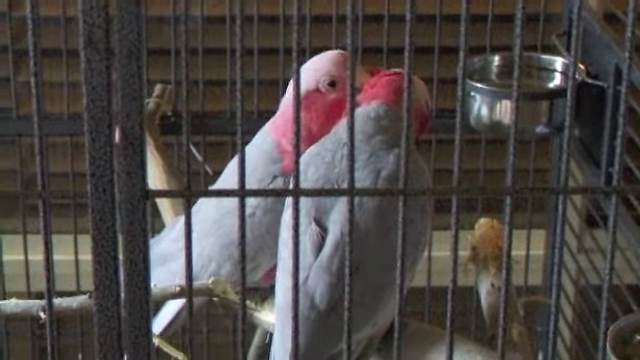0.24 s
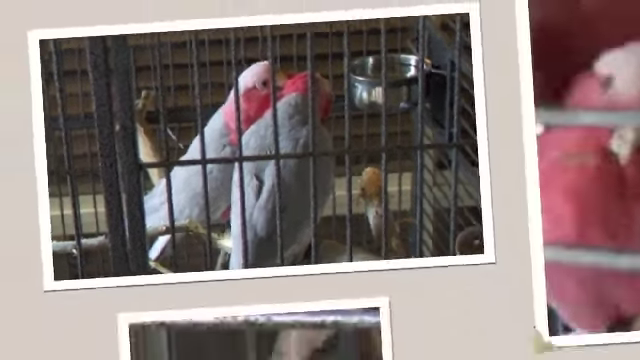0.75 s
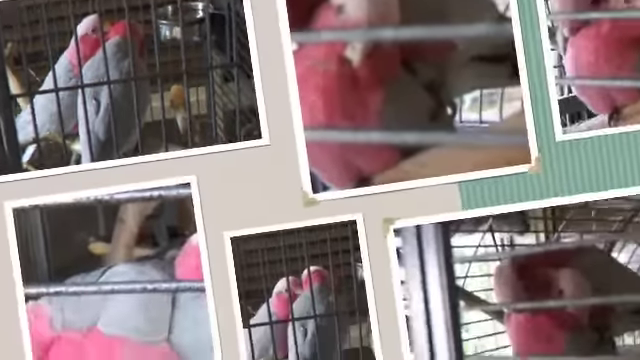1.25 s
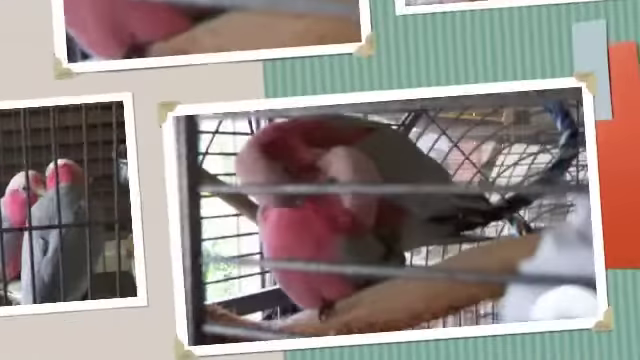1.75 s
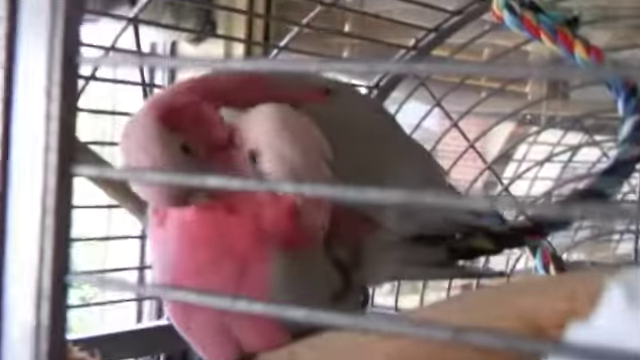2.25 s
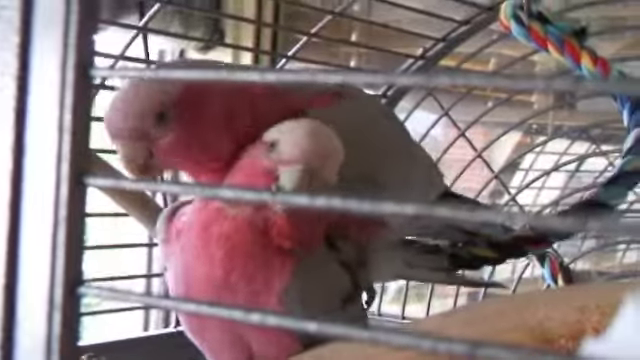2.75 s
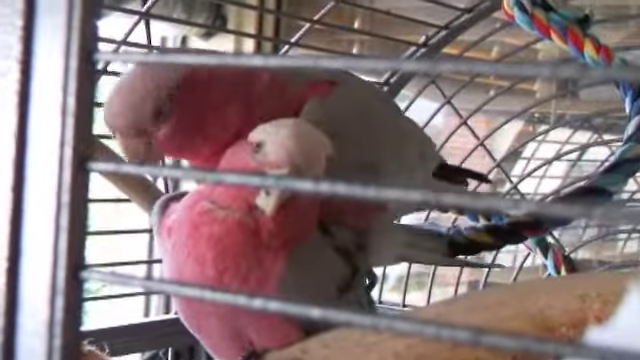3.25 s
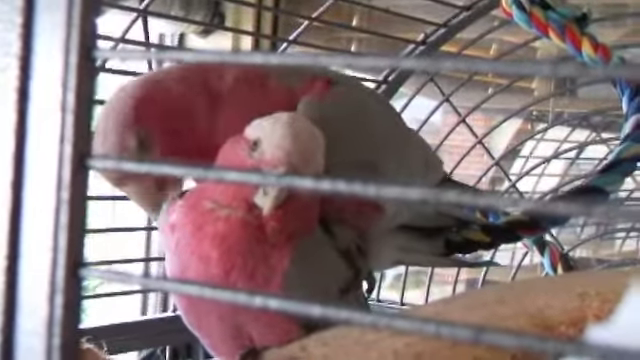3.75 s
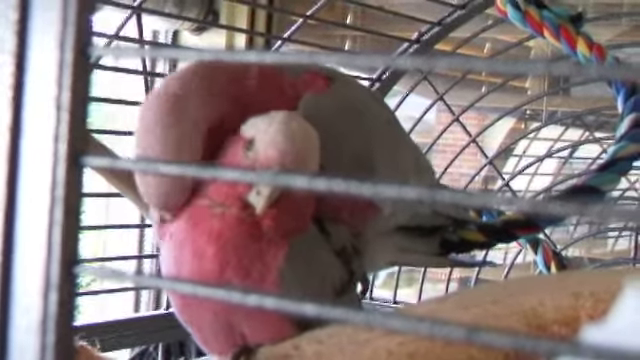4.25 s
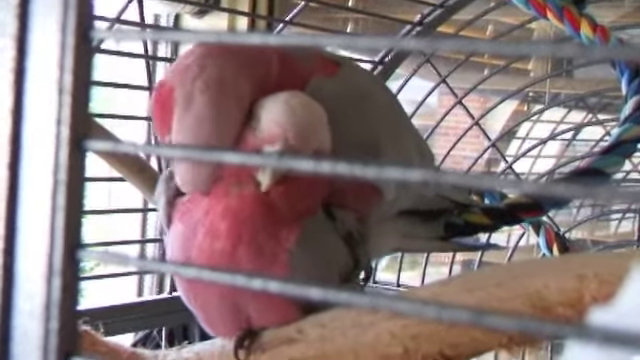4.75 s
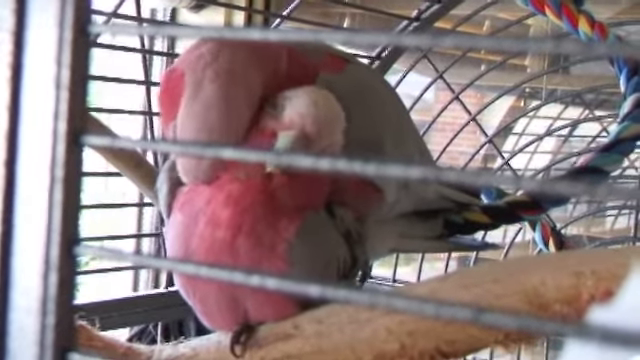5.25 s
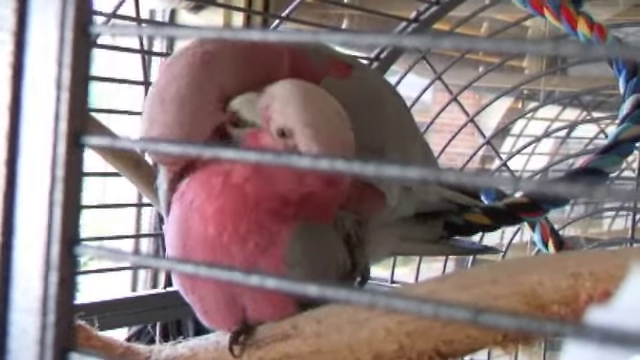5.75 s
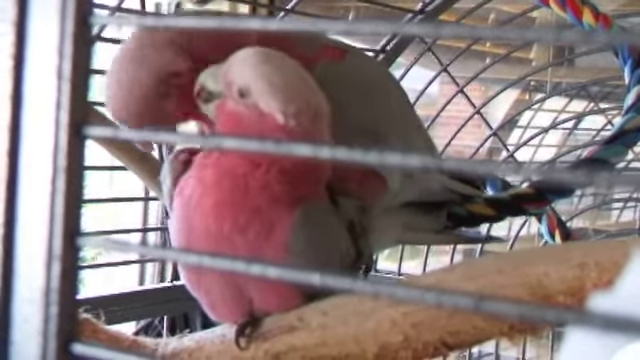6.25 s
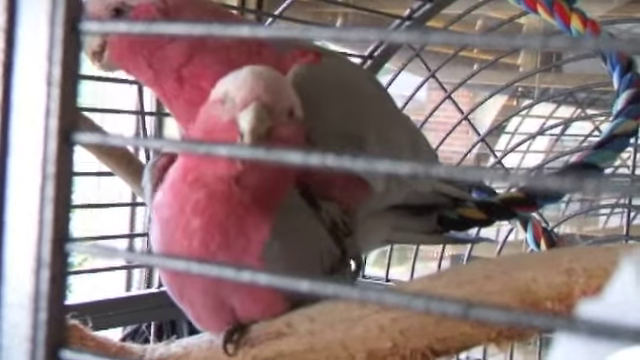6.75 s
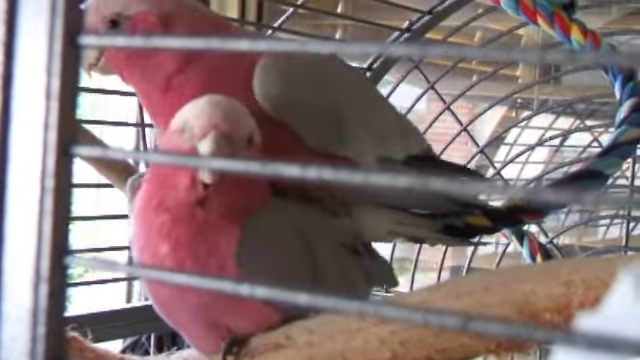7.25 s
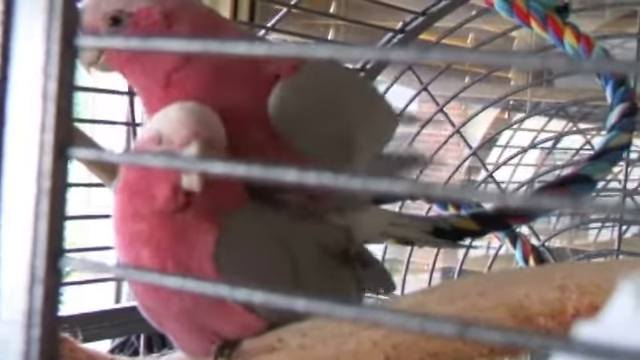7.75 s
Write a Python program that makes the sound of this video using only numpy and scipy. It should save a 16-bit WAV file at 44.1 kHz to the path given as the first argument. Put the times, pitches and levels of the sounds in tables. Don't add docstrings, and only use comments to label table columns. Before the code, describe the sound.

Two cockatoos give shrill, hoarse two-note squeaks while claws and beaks knock ringing cage bars and feathers scrape wire on a hard-walled porch.

```python
import sys
import numpy as np
from scipy import signal
from scipy.fft import rfft, irfft
from scipy.io import wavfile
from scipy.ndimage import uniform_filter1d

SR = 44100
rng = np.random.default_rng(int(sys.argv[2]) if len(sys.argv) > 2 else 0)


def dump(signal):
    limited = np.clip(np.atleast_2d(signal).T, -1, 1)
    pcm = np.round(limited * 32767).astype(np.int16)
    wavfile.write(sys.argv[1], SR, pcm)


def rack_gain(trim_db):
    fader = np.asarray(trim_db, float)
    return 10 ** (fader / 20)


N = 352800
TIME = np.arange(N) / SR
CUT_S = 1.343


def in_time(rows):
    s, *columns = np.transpose(rows)
    return [np.interp(TIME, s, column) for column in columns]


def rms_one(x):
    return x / np.sqrt(np.mean(x ** 2) + 1e-20)


def band(x, low_hz, high_hz):
    return signal.sosfilt(signal.butter(2, [low_hz, high_hz], "band", fs=SR, output="sos"), x)


def drift(rate_hz):
    r = np.exp(-2 * np.pi * rate_hz / SR)
    wander = signal.lfilter([1], [1, -2 * r, r * r], rng.standard_normal(N + SR))
    return rms_one(wander[SR:])


def coloured(white, spectrum):
    hz, db = np.transpose(spectrum)
    bins = np.log(np.arange(N // 2 + 1) * SR / N + 1)
    return rms_one(irfft(rfft(white) * rack_gain(np.interp(bins, np.log(hz), db)), N))


def soft_ends(rows, fade_s):
    return np.clip(np.minimum(TIME - rows[0][0], rows[-1][0] - TIME) / fade_s, 0, 1)


def pings(rows, t60s, rise_s):
    out = np.zeros(N)
    for (s, db, hz, *_), t60 in zip(rows, t60s):
        t = np.maximum(TIME - s, 0)
        out += rack_gain(db - 60 * t / t60) * (1 - np.exp(-t / rise_s)) * np.sin(2 * np.pi * hz * t)
    return out


def fade_in_db():
    # t/s, level/dB
    fade = [(1.35, -38), (1.45, -24), (1.62, -15.5), (1.85, -10.5), (2.05, -7)]
    return in_time(fade)[0]


def air(spectrum, level_db):
    return rack_gain(level_db + 2.25 * drift(4.9)) * coloured(rng.standard_normal(N), spectrum)


def traffic():
    # t/s, level/dB, half width/s
    passes = [(2.32, -44, 0.05), (3.85, -66, 0.24), (4.68, -57, 0.046), (4.95, -61, .08), (7.0, -67, 0.58)]
    hum = rack_gain(-60) * np.where(TIME < CUT_S, 1, rack_gain(fade_in_db()))
    for s, db, width_s in passes:
        hum = hum + rack_gain(db) * np.exp(-((TIME - s) / width_s) ** 2)
    return hum * rms_one(band(rng.standard_normal(N), 61, 75))


def camera_thumps():
    # t/s, peak level/dB, f/Hz, t60/s
    thumps = [
        (0.298, -40, 139, 0.086),
        (2.285, -37, 135.4, 0.35),
        (6.019, -42.5, 229, 0.72),
    ]
    return pings(thumps, [row[3] for row in thumps], rise_s=0.00079)


def squeak_rows(beats, pitches, effort, held_s):
    # share of rise time, share of pitch step, level under top/dB, beak/dB
    arch_up = [(0, 0, -9, -9.5), (0.182, .45, -9.5, 11.5), (0.549, .93, -1, 7.5), (1, 0.99, 1, -1.5)]
    # time after top/s, share of top pitch, level under top/dB, beak/dB
    arch_down = [(.007, .94, -3, 8), (.015, .84, -3.5, 4), (.028, .66, -23.5, -8.5)]
    hoarse = dict(rise=.15, fall=.7, climb=.48, crack=.75, settle=.12, held=.03)
    crack_s, settle_s, swell_s, release_s = .012, .006, .012, .02
    crack_db = -1.5
    start, top, climb, crack, clear = beats
    start_hz, top_hz, from_hz, to_hz, held_hz = pitches
    top_db, arch_beak_db, climb_db, held_db, beak_db = effort

    rows = []
    for share, step, db, open_db in arch_up:
        pitch = start_hz + step * (top_hz - start_hz)
        rows.append((start + share * (top - start), pitch, top_db + db, arch_beak_db + open_db, hoarse["rise"]))
    for t, share, db, open_db in arch_down:
        rows.append((top + t, top_hz * share, top_db + db, arch_beak_db + open_db, hoarse["fall"]))

    wide_db = beak_db + 0.5
    end = clear + held_s
    swelled_hz = from_hz + (to_hz - from_hz) * swell_s / (crack - crack_s - climb)
    return rows + [
        (climb, from_hz, climb_db - 10.5, wide_db, hoarse["climb"]),
        (climb + swell_s, swelled_hz, climb_db, wide_db, hoarse["climb"]),
        (crack - crack_s, to_hz, climb_db, wide_db, hoarse["climb"]),
        (crack, held_hz * 1.07, held_db + crack_db, wide_db, hoarse["crack"]),
        (clear - settle_s, held_hz * 1.01, held_db + 2 * crack_db, beak_db, hoarse["crack"]),
        (clear, held_hz, held_db, beak_db, hoarse["settle"]),
        (end, held_hz, held_db - 9, beak_db, hoarse["held"]),
        (end + release_s, held_hz, held_db - 52, beak_db, hoarse["held"])]


def squeak(rows, shake, throb, hiss):
    pitch, level_db, beak_db, rough = in_time(rows)
    pitch = uniform_filter1d(pitch, size=500)
    phase = 2 * np.pi * np.cumsum(pitch * (1 + .045 * rough * shake)) / SR
    third = rack_gain(-2 - 12 * np.clip(3 * pitch / 1000 - 7.1, 0, 3))
    upper = np.sin(2 * phase)
    upper += third * np.clip(3.3 * rough, .35, 1) * np.sin(3 * phase)
    upper += rack_gain(-19.5) * np.sin(4 * phase)
    upper += rack_gain(-14) * rough * hiss
    chop_db = 9 * np.tanh(rough * throb)
    return soft_ends(rows, .003) * rack_gain(level_db + chop_db) * (np.sin(phase) + rack_gain(beak_db) * upper)


def cockatoo_calls():
    # start/s, top/s, climb/s, crack/s, clear tone/s
    beats = [(1.148, 1.184, 1.228, 1.272, 1.29),
                                                                                                                  (1.634, 1.684, 1.725, 1.764, 1.79),
                                                                                                                  (3.056, 3.09, 3.135, 3.177, 3.214),
                                                                                                                  (4.997, 5.028, 5.075, 5.158, 5.178),
                                                                                                                  (7.599, 7.638, 7.678, 7.737, 7.75)]
    # start f/Hz, top f/Hz, climb from f/Hz, climb to f/Hz, held f/Hz
    pitches = [(2400, 2640, 1720, 1950, 2020), (2760, 3300, 2000, 2480, 2605),
               (2630, 3150, 2000, 2400, 2578), (2435, 2880, 2090, 2220, 2410),
               (2693, 2980, 2150, 2360, 2305)]
    # arch level/dB, arch beak/dB, climb level/dB, held level/dB, held beak/dB
    efforts = [(-30.5, -4.5, -27, -34, -9.5), (-7.5, -0.5, -17, -9.5, 6), (-7, 1, -12, -8, 2.5),
               (-8, 0.5, -16.5, -11, 2.5), (-8.5, 4.5, -13, -8.5, -1)]
    held_s = [.005, .07, .112, .02, .065]
    shake, throb = drift(500), drift(230)
    hiss = rms_one(band(rng.standard_normal(N), 4200, 7500))
    calls = [squeak_rows(*parts) for parts in zip(beats, pitches, efforts, held_s)]
    return [squeak(rows, shake, throb, hiss) for rows in calls]


def porch(x, wet_db):
    t = TIME[:SR]
    near, far = (rms_one(rack_gain(-60 * t / t60)) / np.sqrt(SR) for t60 in (.3, .55))
    echo_gap_s = .006
    build_up = 1 - np.exp(-(t / echo_gap_s) ** 2)
    tail = rng.standard_normal(SR) * np.hypot(rack_gain(-3) * near, rack_gain(-9) * far) * build_up
    heard = x + rack_gain(wet_db) * signal.fftconvolve(x, tail)[:N]
    return signal.sosfilt(signal.butter(4, 7700, fs=SR, output="sos"), heard)


def rustle():
    # f/Hz, level/dB per Hz
    scrape_colour = [(1350, -43), (2300, -16.5), (2690, -8.5), (3350, -12.5), (5160, -10.5), (6460, -9),
                     (7210, -11), (8000, -4), (10400, -77.5), (17600, -120)]
    # t/s, bright scrape level/dB, dull shuffle level/dB, swell/s, fade t60/s
    shifts = [(2.031, -51, -57, .02, 3.2), (2.305, -39.5, -48, 0.014, 0.39),
              (2.535, -44.5, -49.5, 0.058, 1.3), (2.645, -42, -50, 0.013, 1.05),
              (3.71, -51.5, -71, 0.044, 0.077), (4.357, -44, -46, 0.018, 0.18),
              (4.448, -25.5, -36, 0.004, 0.22), (4.599, -60, -51, 0.061, .5),
              (4.719, -52.5, -55.5, 0.057, 1.05), (5.639, -42.5, -40.5, 0.0068, 0.72),
              (5.982, -29.5, -31, 0.0056, .9), (6.068, -31, -51, 0.14, 0.54), (6.455, -35, -39, 0.01, 0.53),
              (6.92, -35, -45, 0.15, 0.36), (7.0, -36.5, -41, 0.031, 0.99), (7.345, -44, -47, 0.02, 0.76),
              (7.53, -47, -49, 0.18, 0.22)]
    grains_per_s = 5000
    grain_db = 1.6 * np.minimum(rng.exponential(1, N), 4) + 1.51 * drift(38)
    grains = (rng.random(N) < grains_per_s / SR) * rack_gain(20 * grain_db / 20) * rng.choice([-1, 1], N)
    bright = coloured(grains, scrape_colour)
    dull = rms_one(band(grains[::-1], 620, 2200))
    fidget = rack_gain(fade_in_db())
    scrape, shuffle = rack_gain(-53.5) * fidget, rack_gain(-56.5) * fidget
    for s, scrape_db, shuffle_db, swell_s, t60 in shifts:
        shape_db = np.where(TIME < s, 20 * (TIME - s) / swell_s, -60 * (TIME - s) / t60)
        scrape = np.hypot(scrape, rack_gain(scrape_db + shape_db))
        shuffle = np.hypot(shuffle, rack_gain(shuffle_db + shape_db))
    return rack_gain(5.0) * (scrape * bright + shuffle * dull)


def far_tone(rows, flutter):
    pitch, level_db = in_time(rows)
    phase = 2 * np.pi * np.cumsum(pitch) / SR
    return soft_ends(rows, 0.0067) * rack_gain(level_db + 2.5 * flutter) * np.sin(phase)


def dove_and_cricket(flutter):
    # t/s, length/s, from f/Hz, to f/Hz, level/dB
    coos = [
        (2.703, 0.17, 830, 755, -38),
        (4.031, 0.16, 740, 659, -39.5),
        (5.279, 0.074, 830, 800, -31),
        (6.737, 0.088, 725, 751, -40),
        (6.856, 0.097, 810, 726, -34.5),
        (7.427, .14, 735, 664, -40),
        (1.496, 0.086, 7050, 7050, -36.5),
        (1.8, .16, 7080, 7050, -49),
    ]
    edge = 0.086
    shares = np.array([0, edge, 1 - edge, 1])
    out = np.zeros(N)
    for s, length, from_hz, to_hz, db in coos:
        pitch = from_hz + (to_hz - from_hz) * shares
        level_db = db - 2 * np.array([1, 0, 0, 1])
        out += far_tone(np.transpose([s + length * shares, pitch, level_db]), flutter)
    return out


def ring(x, hz, t60):
    r, w = rack_gain(-60 / (t60 * SR)), 2 * np.pi * hz / SR
    return signal.lfilter([0, np.sin(w)], [1, -2 * r * np.cos(w), r * r], x + 1e-18)


def cage():
    # f/Hz, level/dB, t60/s
    frame_tones = [(733, -1, 0.2), (800, 0, 0.14), (1069, -12, 0.15)]
    bar_tones = [(1547, -13, 0.031), (1750, -7.5, 0.043), (1871, -2, 0.044), (2030, 1, 0.07),
                 (2167, -5, 0.06), (2650, -11.5, 0.049), (3033, -7, 0.07)]
    wire_tones = [(4100, -3.5, 0.05), (4450, -5.5, 0.055), (4890, -9.5, 0.09), (5140, -7, 0.055),
                  (6090, -8, 0.12), (6160, -12, 0.048), (7275, -7, 0.055)]
    # t/s, peak level/dB, frame level/dB, wires level/dB, rattle t60/s
    long_blows = [(2.2059, -39.5, -41, -63, 0.31), (2.2948, -34, -55, -47, 0.15),
                  (3.4566, -23, -26, -39, 0.39), (3.5217, -55, -30.5, -37, 0.2),
                  (3.6676, -36, -36.5, -67, 0.049), (4.348, -24.5, -39, -30.5, 0.3),
                  (4.44, -12.5, -19, -27, 0.29), (4.5878, -33, -59, -66, .24),
                  (4.659, -41, -35.5, -66, 0.18), (5.2894, -28, -40, -69, .2),
                  (5.632, -31, -29.5, -45.5, 0.29), (5.657, -28, -30, -62, 0.4),
                  (5.9708, -11.5, -13, -28, 0.28), (6.4458, -18.5, -31, -26, 0.38),
                  (6.7507, -36, -42, -41, 0.49), (6.8868, -31, -57, -29.5, 0.072),
                  (6.9769, -35, -33, -29, 0.96), (7.3362, -18, -38, -55, 0.35),
                  (7.8955, -26.5, -35, -56, .11)]
    short_blows = [(2.5277, -33, -66, -46, 0.13), (2.576, -60, -49.5, -32.5, 0.42),
                   (2.6224, -56, -58, -33, 0.24), (3.4426, -18.5, -29.5, -49, 0.21),
                   (3.695, -24.5, -56, -55, 0.13), (4.704, -31, -63, -37.5, 0.1),
                   (5.7884, -37.5, -64.5, -39, 1), (7.5158, -30.5, -50, -58, 0.25)]
    long_bar_hz, short_bar_hz = 1984, 3065
    knocks = [(*row, long_bar_hz) for row in long_blows] + [(*row, short_bar_hz) for row in short_blows]
    rattle = rms_one(rack_gain(1.5 * np.minimum(rng.exponential(1, N), 4)) * rng.choice([-1, 1], N))
    # tones, column of the blow's level, low f/Hz, high f/Hz, part level/dB, broad level/dB
    parts = [(frame_tones, 2, 600, 1400, 14.0, -1.0),
             (bar_tones, 1, 1400, 3600, 3.0, -4.0),
             (wire_tones, 3, 3600, 8000, 14.0, -1.5)]
    out = np.zeros(N)
    for modes, column, low_hz, high_hz, part_db, broad_db in parts:
        blows, broad = np.zeros((len(modes), N)), np.zeros(N)
        for row in knocks:
            at = round(row[0] * SR)
            t = TIME[:min(N - at, SR // 2)]
            here = slice(at, at + len(t))
            push = 0.33 * rattle[here] * rack_gain(-60 * t / np.clip(row[4], .02, 1.5))
            push *= 1 + 2.27 * rack_gain(-60 * t / 0.032)
            push[0] = 1
            push *= rack_gain(row[column] + part_db)
            blows[:, here] += rack_gain(rng.normal(0, 5, (len(modes), 1))) * push
            broad[here] += push
            if modes is bar_tones:
                out[here] += rack_gain(-19) * ring(push, row[5], .03)
        for blow, (hz, db, t60) in zip(blows, modes):
            out += rack_gain(db - 32) * ring(blow, hz, t60)
        out += rack_gain(broad_db) * band(broad, low_hz, high_hz)
    return band(out, 870, 11000)


def ticking_bird():
    # t/s, peak level/dB, f/Hz
    ticks = [(2.2476, -36, 4760), (2.4498, -35, 4850), (3.8182, -34, 4700), (3.9185, -34, 4800),
             (4.018, -38, 4730), (4.152, -50, 5060), (5.3857, -68, 4820), (5.4864, -53, 4630),
             (5.5857, -35, 4810), (6.6538, -36, 4840)]
    return pings(ticks, [.05] * len(ticks), rise_s=0.0015)


def far_whistle(flutter):
    # t/s, f/Hz, level/dB
    whistle = [(3.455, 2125, -46), (3.48, 2070, -44), (3.5, 2194, -28), (3.52, 2410, -22.5),
               (3.555, 2464, -24.5), (3.585, 2090, -29), (3.63, 1520, -37)]
    return far_tone(whistle, flutter)


def scene():
    # f/Hz, level/dB per Hz
    first_air = [(12, -38), (20, -7.5), (22, -6), (48, -20), (63, -25.5), (119, -4.5), (192, -6.5),
                 (887, -6.5), (4310, -19), (5540, -19.5), (7310, -20.5), (8080, -30), (10500, -76),
                 (17800, -120)]
    second_air = [(12, -25), (20, -21), (22, -5.5), (65, -8), (378, -9), (450, -8), (498, -7.5),
                  (887, -7.5), (2420, -20.5), (6130, -18), (6950, -18), (8080, -16.5), (10500, -78),
                  (17800, -120)]
    calls = cockatoo_calls()
    first = porch(calls[0], wet_db=9.5) + air(first_air, -45.5)
    flutter = drift(27)
    far = dove_and_cricket(flutter) + ticking_bird() + far_whistle(flutter)
    second = porch(sum(calls[1:]), wet_db=2) + porch(cage() + far, wet_db=-6) + air(second_air, -40.5)
    second = rack_gain(fade_in_db()) * second + rustle()
    return (np.where(TIME < CUT_S, first, second) + traffic() + camera_thumps())[None]


def top_cut(x):
    return signal.sosfilt(signal.butter(12, 8230, fs=SR, output="sos"), x)


def record(dry):
    duck_from_db, duck_share, recover_db_s = -36, .27, 80
    level_db = 10 * np.log10(uniform_filter1d(dry[0] ** 2, size=441) + 1e-12)
    level_db -= fade_in_db() * (TIME > CUT_S)
    recovery_db = recover_db_s * TIME
    held_db = np.maximum.accumulate(level_db + recovery_db) - recovery_db
    duck_db = duck_share * np.maximum(held_db - duck_from_db, 0)
    duck_db *= np.abs(TIME - CUT_S - .14) > .14
    ducked = dry * rack_gain(-signal.lfilter([.002], [1, -.998], duck_db))
    narrow = signal.sosfilt(signal.cheby2(12, 70, 8600, fs=SR, output="sos"), ducked)
    return top_cut(narrow - .0022)


dry = scene()
out = record(dry)
dump(out)
```